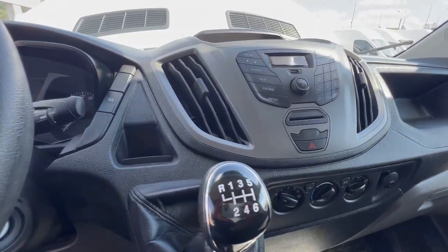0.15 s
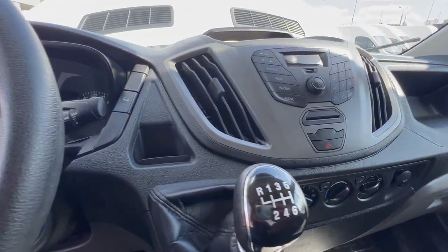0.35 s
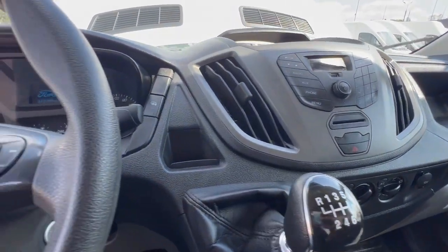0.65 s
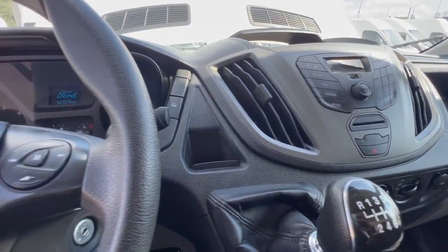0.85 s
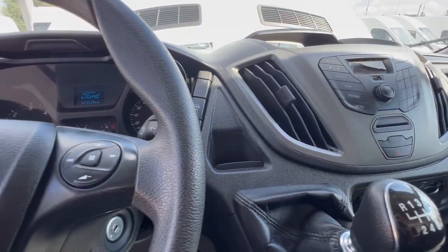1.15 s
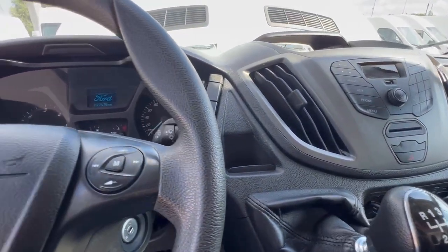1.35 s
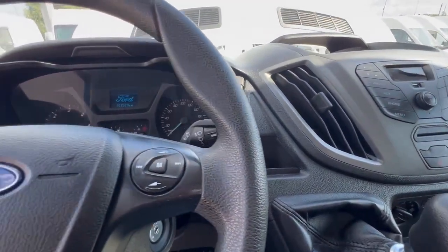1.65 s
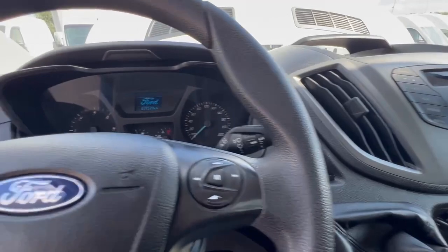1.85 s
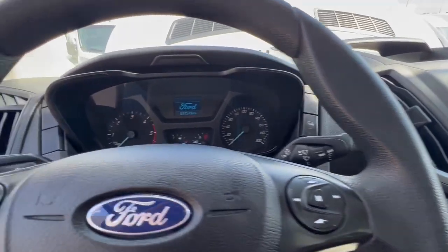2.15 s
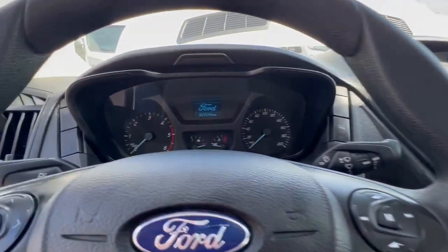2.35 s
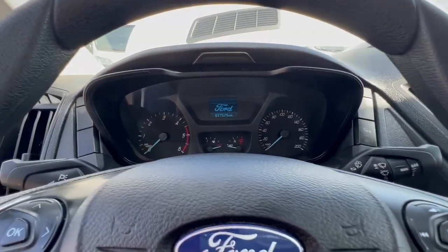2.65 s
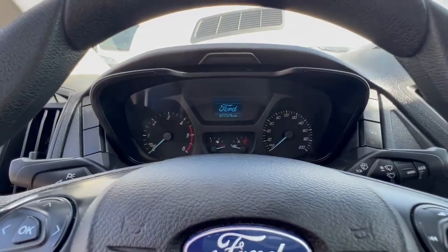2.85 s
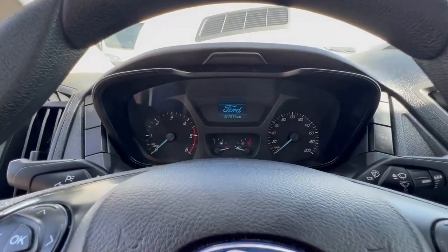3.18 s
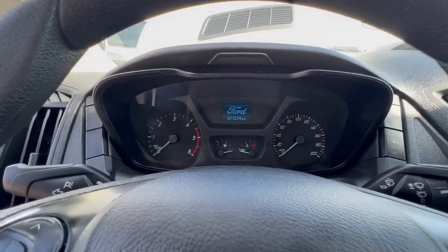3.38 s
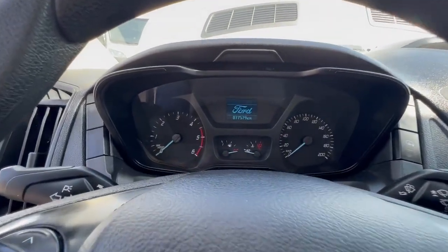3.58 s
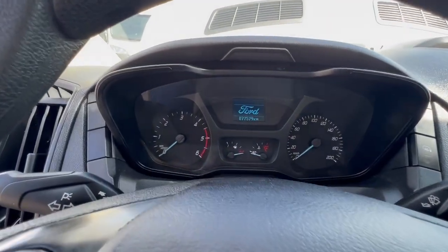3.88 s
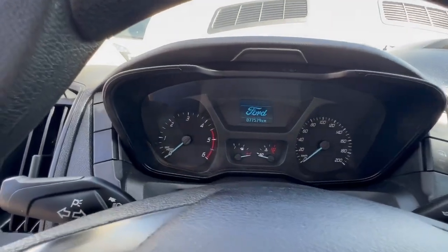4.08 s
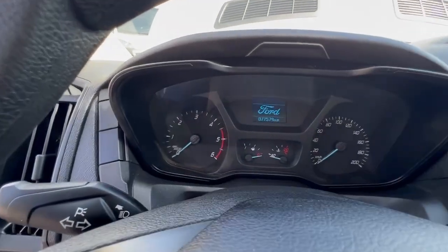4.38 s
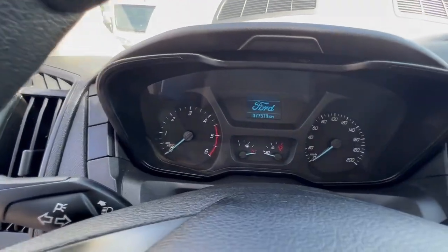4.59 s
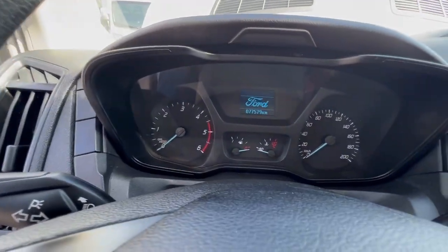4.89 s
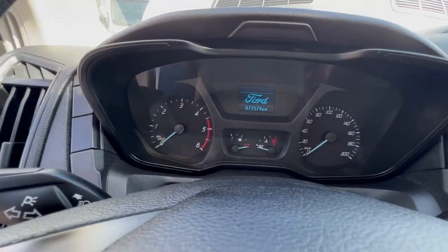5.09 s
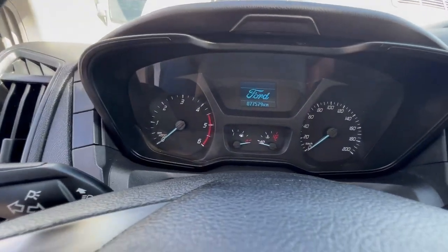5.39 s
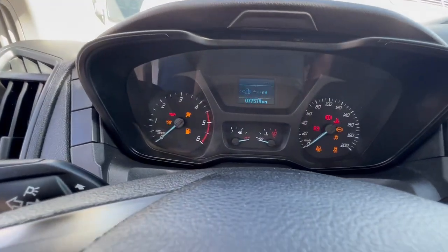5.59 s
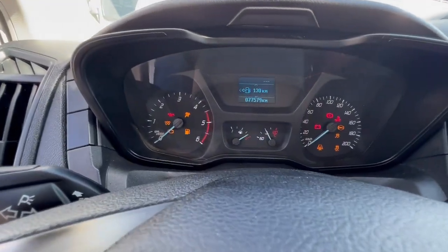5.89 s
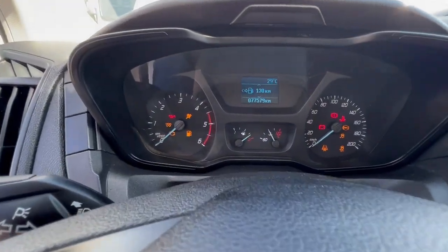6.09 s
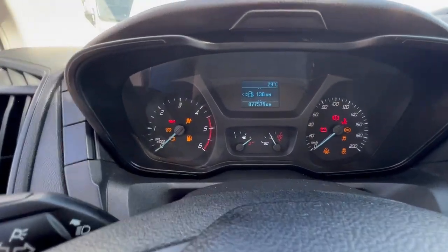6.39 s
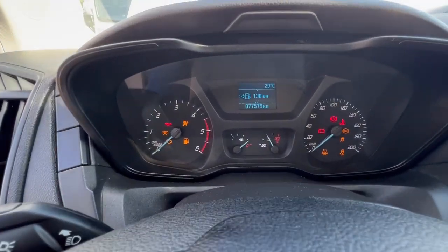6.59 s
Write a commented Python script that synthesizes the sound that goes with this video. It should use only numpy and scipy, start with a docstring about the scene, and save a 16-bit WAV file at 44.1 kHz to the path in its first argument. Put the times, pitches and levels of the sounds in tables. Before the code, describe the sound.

Close, sharp creaks of fingers on a phone come first, on the left, over the low rumble and hiss inside a parked van. Then come a soft sleeve rustle, light key clinks and a faint faraway engine hum. A key slides into the ignition lock with scrapes and clicks, and clacks as it turns. Finally two small motors briefly wind down with soft, low groans.

```python
"""Inside a parked van, a low rumble and a thin hiss fill the cab. First, fingers rub and creak on the
phone near its left microphone, by stick-slip friction. From 2 s a distant engine hums faintly, a sleeve
rustles and hanging keys clink. At 5 s the key scrapes into the ignition lock and turns with a sharp
clack, its impacts exciting the modes of keys, steering column and dashboard. Last, as the electrics
wake, two small motors run down in soft falling groans."""
import sys
import numpy as np
from scipy import signal
from scipy.fft import rfft, irfft, next_fast_len
from scipy.io import wavfile

SR = 44100
rng = np.random.default_rng(int(sys.argv[2]) if len(sys.argv) > 2 else 0)


def transcribe(u):
    """Save the signal u as a 16-bit wav file named by the first command-line argument.

    u: samples, shape (n,) or (channels, n), limited to [-1, 1]; the rate is SR.
    q: integer samples, one column per channel.
    """
    v = np.clip(np.atleast_2d(u).T, -1, 1)
    q = np.round(v * 32767).astype(np.int16)
    wavfile.write(sys.argv[1], SR, q)


N = 297145
TIME = np.arange(N) / SR
FFT_SIZE = next_fast_len(N, True)
HZ = np.maximum(np.arange(FFT_SIZE // 2 + 1) * SR / FFT_SIZE, 1)

# Levels in all tables are relative: later gains and filters act on them.
# Noise in the cab. Each row: time in seconds, rumble level in dB, hiss level in dB.
CAB_NOISE_LEVELS = [(0, -51, -58), (1.55, -50, -58.5), (1.75, -62.5, -61), (2.03, -64.5, -64),
                    (2.15, -54.5, -62), (2.6, -55, -58), (4.9, -48.5, -58.5), (6.74, -47, -58.5)]
# Dull roar from outside. Each row: time in seconds, level in dB.
ROAR_LEVELS = [(0, -58), (1.55, -53.5), (1.8, -63), (2.45, -62.5), (2.8, -52.5), (6.74, -50)]
# Hum of a distant engine. Each row: time in seconds, frequency in Hz, level in dB.
ENGINE_HUM = [(2.05, 89.8, -55.5), (2.8, 90.03, -50.5), (4.7, 92.94, -53), (6.74, 97.2, -101)]
# Spectra of the noises. Each row: frequency in Hz, spectral density in dB.
RUMBLE_SPECTRUM = [(18, -35), (30, -9.5), (42, 8), (54, 7.5), (72, 0.5), (115, -16), (260, -52)]
ROAR_SPECTRUM = [(90, 7), (150, 0.5), (290, -7), (750, -14.5), (1200, -15), (2200, -71)]
HISS_SPECTRUM = [(300, -13), (620, -9.5), (950, -2.5), (1400, -7), (1850, 0), (2200, -9), (3000, -22.5),
                 (5000, -27), (7000, -23), (12000, -44)]
CLOTH_SPECTRUM = [(400, -16), (800, 11.5), (2700, 5), (4000, 3), (10000, 4.5), (11000, -75)]
SKIN_SPECTRUM = [(150, -7), (450, -2.5), (1900, 5.5), (2800, -13.5), (6200, -19), (10000, -39)]
# Likeness of left and right noise. Each row: frequency in Hz, correlation from -1 to 1.
STEREO_CORRELATION = [(110, 0.87), (270, 0.63), (570, -0.32), (1200, -0.3), (3500, 0.21), (11000, -0.26)]
# Balance of the hiss. Each row: frequency in Hz, left minus right in dB.
HISS_BALANCE = [(400, -12.5), (1300, 5), (1900, 12), (3000, 2.5)]

# Sliding movements. Each row: start in seconds, length in seconds, level in dB.
SLEEVE_SLIDES = [(2.02, 0.1, -64), (2.25, 0.31, -63), (2.65, 0.2, -58), (3.06, 0.37, -66),
                 (3.62, 0.23, -55), (3.9, 0.021, -50.5), (4.2, 0.11, -50)]   # the arm reaches for the lock
FINGER_SLIDES = [(.278, 0.026, -44.5), (.395, 0.074, -40), (1.37, 0.0096, -35.5), (1.447, 0.0078, -34)]   # skin moves over the phone
BLADE_SLIDES = [(5.015, 0.038, -45), (5.052, 0.042, -41.5), (5.15, 0.098, -46), (5.392, 0.029, -38.5)]   # the blade finds the slot, enters, slides home and is turned
# Finger creaks. Each row: centre in seconds, peak in dB, half length in seconds,
# first and last slip rate in Hz, tick level in dB.
FINGER_CREAKS = [(0.404, -23, 0.0014, 1760, 890, -41), (0.5247, -35.5, 0.00084, 1970, 1200, -23),
                 (0.898, -7.5, 0.0015, 1920, 533, -37), (0.9356, -22, 0.0013, 1640, 1000, -56),
                 (1.2876, -22.5, 0.0015, 1620, 1660, -30.5), (1.3007, -22, 0.0067, 1690, 1440, -42),
                 (1.3027, -17.5, 0.0015, 1570, 925, -14.5), (1.3121, -6, 0.001755, 1753, 433, -36),
                 (1.4663, -8, 0.0039, 642, 480, -22.5), (1.496, -8, 0.0021, 920, 900, -25.5)]
# Motors running down. Each row: start and length in seconds, first and last frequency in Hz, level in dB.
MOTOR_RUNS = [(6.226, 0.155, 152, 90.5, -41.5), (6.465, 0.163, 125.4, 73.6, -42)]
# Clinks of the hanging keys. Each row: start in seconds, level in dB, emphasised frequency in Hz,
# rattle time in seconds, tap on the column in dB.
KEY_CLINKS = [(2.469, -56, 4200, 0.0028, -59), (2.749, -56, 6560, 0.0017, -54),
              (3.635, -59, 5060, .0012, -48), (3.674, -50.5, 4800, 0.0058, -48.5),
              (3.7475, -54, 4540, 0.0014, -51), (3.992, -52, 3900, 0.00087, -60),
              (4.012, -50, 4800, 0.0037, -64), (4.095, -38, 3880, 0.0033, -41.5),
              (4.196, -33.5, 4400, 0.01, -44), (4.6768, -49.5, 4440, 0.0015, -62),
              (4.7666, -46.5, 5800, 0.0027, -50), (4.962, -55, 8200, 0.0026, -51.5),
              (5.2747, -44, 7140, 0.0016, -43.5), (5.535, -43.5, 7850, 0.0061, -43),
              (5.7057, -54, 9000, 0.023, -59)]
# The hand bumps the column. Each row: start in seconds, knock and thump in dB, rattle time in seconds.
HAND_BUMPS = [(3.643, -44.5, -61, 0.0052), (4.6752, -54, -51.5, 0.0037), (4.998, -53.5, -43, 0.0048),
              (5.117, -52, -42.5, 0.0088), (5.456, -52, -47.5, 0.0057), (5.491, -52, -56, 0.012),
              (6.099, -52, -52, 0.0091), (6.23, -52.5, -46, 0.0087), (6.399, -52.5, -41, 0.036)]
# The lock catches. Each row: start in seconds, metal level in dB, emphasised frequency in Hz,
# rattle time in seconds, knock and thump in dB.
LOCK_CLACKS = [(5.05, -44, 4500, 0.0027, -45, -43), (5.0827, -46, 7700, 0.004, -38.5, -38),
               (5.195, -46, 4220, 0.0035, -60, -47), (5.2112, -41.5, 3900, 0.0027, -42.5, -36),
               (5.222, -43, 7300, 0.0017, -39.5, -33), (5.292, -50, 3500, 0.0028, -42.5, -43),
               (5.309, -37.5, 3400, 0.0012, -38, -37.5), (5.3771, -33, 2900, 0.0033, -35, -35),
               (5.3824, -30, 6900, 0.005, -36.5, -31.5)]

# Modes of the keys. Each row: frequency in Hz, strength in dB.
KEY_RESONANCES = [(2965, 4), (3240, 0.5), (3610, 1.5), (4120, -0.5), (4320, 4), (4650, -2.5), (5820, -7),
                  (6265, -4), (6570, -5), (6850, -7), (8100, -4), (8420, 0), (9355, 1.5), (9755, -6.5)]
# Modes of the other bodies. Each row: frequency in Hz, bandwidth in Hz, strength in dB.
COLUMN_RESONANCES = [(814, 63, 6), (1077, 22, 8), (1420, 230, 0), (1976, 130, 4.5), (2280, 54, 2.5),
                     (2625, 155, 0)]
DASH_RESONANCES = [(118, 41, -0.21), (227, 40, 0.78), (297, 20.4, 0), (477, 77, 2), (626, 66, -1.5)]
CASE_RESONANCES = [(480, 246, 2.1), (1150, 220, 0.72), (1910, 290, 1.8)]
FLEX_RESONANCES = [(92, 75, -1.5), (260, 127, -1)]   # the phone gives under each push
# Reverberation of the cab. Each row: frequency in Hz, time to fall 60 dB in seconds.
CAB_DECAY = [(100, 0.37), (1000, 0.11), (11000, 0.14)]

CRACK_HZ = (2700, 8300)   # band of the bare click of a hard contact


def from_db(db):
    """Amplitude grows tenfold for every 20 dB."""
    return 10 ** (np.asarray(db) / 20)


def unit_rms(x):
    """Normalisation to a mean power of 1."""
    return x / np.sqrt(np.mean(x ** 2) + 1e-20)


def in_time(rows):
    """Linear interpolation gives each column a value at every sample."""
    times, *columns = np.transpose(rows)
    return [np.interp(TIME, times, column) for column in columns]


def at_hz(points, hz):
    """Interpolation on a logarithmic frequency axis."""
    frequencies, values = np.transpose(points)
    return np.interp(np.log(hz), np.log(frequencies), values)


def balance(db):
    """A level difference, left minus right, places a sound to one side."""
    return from_db(np.array([[.5], [-.5]]) * db)


def band(x, low_hz, high_hz):
    """A causal Butterworth band-pass."""
    sections = signal.butter(2, [low_hz, min(high_hz, .45 * SR)], "band", fs=SR, output="sos")
    return signal.sosfilt(sections, x + 1e-18)


def lowpass(x, hz, order=8):
    """A causal Butterworth low-pass."""
    return signal.sosfilt(signal.butter(order, hz, fs=SR, output="sos"), x)


def through(x, response):
    """Convolution gives a linear system's answer to a stereo input, cut to the input's length."""
    return signal.fftconvolve(x, np.atleast_2d(response), axes=1)[:, :x.shape[1]]


def at_level(x, db):
    """Energy normalisation: each channel holds the energy of 20 ms at the given rms level."""
    return from_db(db) * x * np.sqrt(.02 * SR / np.sum(x ** 2, axis=1, keepdims=True))


def add(out, start, sound):
    """Superposition: a short stereo sound joins the mix at a time in seconds."""
    at = round(start * SR)
    out[:, at:at + sound.shape[1]] += sound[:, :N - at]


def drift(corner_hz):
    """Low-passed noise is a random fluctuation; rms 1."""
    spectrum = rfft(rng.standard_normal(FFT_SIZE)) / (1 + (HZ / corner_hz) ** 2)
    return unit_rms(irfft(spectrum, FFT_SIZE)[:N])


def noise(spectrum, balance_db=0):
    """Partly coherent stereo noise of a given colour, most alike in the bass; rms 1."""
    mid, side = rfft(rng.standard_normal((2, FFT_SIZE)))
    correlation = at_hz(STEREO_CORRELATION, HZ)
    stereo = np.sqrt(1 + correlation) * mid + np.sqrt(1 - correlation) * side * [[1], [-1]]
    skirts = np.minimum(HZ / spectrum[0][0], 1) ** 2 * np.minimum(spectrum[-1][0] / HZ, 1) ** 2
    coloured = stereo * balance(balance_db) * skirts * from_db(at_hz(spectrum, HZ))
    return unit_rms(irfft(coloured, FFT_SIZE)[:, :N])


def uneven(spread_db, shape):
    """Log-normal gains, capped one standard deviation above the median."""
    return from_db(spread_db * np.minimum(rng.standard_normal(shape), 1))


def grit(per_s, spread_db):
    """A Poisson train of clicks, unequal in size and at the two microphones; rms 1."""
    at = np.flatnonzero(rng.random(N) < per_s / SR)
    clicks = np.zeros((2, N))
    clicks[:, at] = uneven(spread_db, len(at)) * rng.standard_normal((2, len(at)))
    return unit_rms(clicks)


def strokes(rows, attack_s, release_s):
    """Envelope of sliding friction: each stroke swells around its start, holds and decays."""
    gain = np.zeros(N)
    for start, length, db in rows:
        swell = np.clip((TIME - start) / attack_s + .5, 0, 1)
        fade = np.exp(-np.clip((TIME - start - length) / release_s, 0, 20))
        gain = np.maximum(gain, from_db(db) * swell * fade)
    return gain


def contacts(rattle_s, per_s=1300, grain_db=11.0, scuff_db=-12.0, rise_share=0.47, size=6000):
    """An impact is a burst of tiny contacts and scuffing that builds as the parts meet, then decays."""
    t = np.arange(1, size + 1) / SR
    impulses = (rng.random(size) < per_s / SR) * uneven(grain_db, size)
    envelope = (1 - np.exp(-t / (rise_share * rattle_s))) * np.exp(-t / rattle_s)
    # each contact reaches the two microphones with its own strength and sign
    return (impulses + from_db(scuff_db)) * rng.standard_normal((2, size)) * envelope


def body(modes, spread_db=0, size=4096):
    """A struck body rings as a sum of damped modes, weighted by the point struck; unit energy."""
    t = np.arange(size) / SR
    hz, width, db = np.transpose(modes)[:, :, None]
    polarity = (-1) ** np.arange(len(modes))[:, None]
    strength = from_db(db) * uneven(spread_db, db.shape) * width * polarity
    response = np.sum(strength * np.exp(-np.pi * width * t) * np.cos(2 * np.pi * hz * t), axis=0)
    return response / np.linalg.norm(response)


def cab(x, wet_db, size=9000):
    """Reverberation: dense reflections off glass and trim decay exponentially in every octave."""
    t, tail = np.arange(size) / SR, 0
    for hz in 90 * 2. ** np.arange(8):
        octave = band(rng.standard_normal((2, size)), hz / np.sqrt(2), hz * np.sqrt(2))
        tail += octave * from_db(-60 * t / at_hz(CAB_DECAY, hz))
    tail *= t > .002   # the first reflection takes 2 ms
    return x + from_db(wet_db) * through(x, tail / np.linalg.norm(tail, axis=1, keepdims=True))


def background(rumble_db=3.5, hiss_db=4.5, hum_db=2.0, waver_db=3.5):
    """Transmission into the cab: broadband rumble, roar and hiss, and a distant engine's wavering tone."""
    rumble_level, hiss_level = in_time(CAB_NOISE_LEVELS)
    hum_hz, hum_level = in_time(ENGINE_HUM)
    phase = 2 * np.pi * np.cumsum(hum_hz + drift(6.6)) / SR
    fade_in = np.clip((TIME - ENGINE_HUM[0][0]) / 0.12, 0, 1)
    rumble = from_db(rumble_level + rumble_db) * noise(RUMBLE_SPECTRUM)
    roar = from_db(in_time(ROAR_LEVELS)[0]) * noise(ROAR_SPECTRUM)
    hiss = from_db(hiss_level + hiss_db) * noise(HISS_SPECTRUM, at_hz(HISS_BALANCE, HZ))
    hum = from_db(hum_level + hum_db + waver_db * drift(21.0)) * fade_in * np.sqrt(2) * np.sin(phase)
    return rumble + roar + hiss + hum


def sleeve(grain_db=1.0, catch_db=2.5, crackle_db=-10.5, top_hz=9800):
    """Friction noise: fibres catch and let go in a fine crackling hiss."""
    cloth = from_db(grain_db * drift(250.0) + catch_db * drift(25.0)) * noise(CLOTH_SPECTRUM)
    snaps = band(grit(per_s=420, spread_db=9.0), 1400, top_hz)
    rustle = lowpass(cloth + from_db(crackle_db) * unit_rms(snaps), top_hz, order=12)
    return strokes(SLEEVE_SLIDES, attack_s=0.11, release_s=0.056) * unit_rms(rustle)


def motors(subharmonic_db=-3.0):
    """Pitch follows rotation speed: each slowing motor glides down over a weaker tone an octave below."""
    out = np.zeros(N)
    for start, length, first_hz, last_hz, db in MOTOR_RUNS:
        progress = np.clip((TIME - start) / length, 0, 1)
        phase = 2 * np.pi * np.cumsum(first_hz + (last_hz - first_hz) * progress) / SR
        envelope = from_db(db) * np.sqrt(2 * np.abs(np.sin(np.pi * progress)))
        out += envelope * (np.sin(phase) + from_db(subharmonic_db) * np.sin(phase / 2))
    return out


def fingers(far_side_db=-26.5, thud_db=-4.5, push_db=-20.0, rub_db=-15, rub_fade_s=0.0059, size=8192):
    """Stick-slip friction: skin slips ever more slowly, ringing the case and the left microphone port."""
    creak, ticks, push = np.zeros((3, N))
    sliding = strokes(FINGER_SLIDES, attack_s=0.058, release_s=0.017)
    t = (np.arange(size) - size // 2) / SR
    case, flex = body(CASE_RESONANCES), body(FLEX_RESONANCES)
    for centre, peak_db, half_length, first_hz, last_hz, tick_db in FINGER_CREAKS:
        pressure = np.exp(-(t / half_length) ** 2)
        slip_hz = np.interp(t, [0, half_length], [first_hz, last_hz])
        cycles = np.cumsum(slip_hz) / SR
        slip_count = np.floor(cycles - cycles[size // 2])
        # the longer the skin sticks, the harder it slips
        slips = np.diff(slip_count, prepend=slip_count[0]) * pressure / np.sqrt(slip_hz)
        ring = lowpass(band(signal.fftconvolve(slips, case)[:size], 150, 2800), 2550)
        sway = signal.fftconvolve(pressure, flex)[:size]
        at = round(centre * SR) - size // 2
        span = slice(at, at + size)
        creak[span] += from_db(peak_db) * ring / np.abs(ring).max()
        ticks[span] += from_db(tick_db) * pressure ** 2 * rng.standard_normal(size)
        push[span] += from_db(peak_db + push_db) * sway / np.abs(sway).max()
        # after each creak the skin rubs on and fades
        rub_envelope = np.where(t < 0, pressure, np.exp(-np.abs(t) / rub_fade_s))
        sliding[span] += from_db(peak_db + rub_db) * rub_envelope
    rub = sliding * from_db(3.0 * drift(240.0)) * noise(SKIN_SPECTRUM)[0]
    treble = from_db(-1.0) * band(ticks, 7100, 7200) + from_db(-6.5) * band(ticks, 7700, 8200)
    crackle = band(ticks, 3040, 5440) + treble
    near = creak + crackle + rub + band(push, 45, 420)
    # the thud travels through the case to both microphones
    thud = from_db(thud_db) * band(near, 66, 820) * [[1], [-1]]
    return near * from_db([[0], [far_side_db]]) + thud


def key_ring(spread_db, detune, width_hz=77):
    """Free vibration of one key: the bunch's modes, each with its own strength and slight shift."""
    modes = [(hz * (1 + detune * rng.standard_normal()), width_hz, db) for hz, db in KEY_RESONANCES]
    return body(modes, spread_db)


def jingle(touch, db, bright_hz, ring_db=-4.0, focus_db=0.5):
    """Damping: held in the hand, the keys ring only briefly behind the crack of the contact."""
    ring = through(touch, key_ring(spread_db=11.0, detune=0.018))
    metal = band(touch, *CRACK_HZ) + from_db(ring_db) * ring
    # the size of the part that strikes decides which modes stand out
    focus = band(metal, bright_hz / 1.23, bright_hz * 1.32)
    return at_level(metal + from_db(focus_db) * focus, db)


def knock(touch, db, crack_db=-6.5):
    """Impact response of the steering column's plastic shroud: a dry crack and a short ring."""
    ring = band(through(touch, body(COLUMN_RESONANCES, spread_db=5.5)), 240, 2900)
    return at_level(ring + from_db(crack_db) * band(touch, 670, 2650), db)


def thump(touch, db, panel_db=2.0):
    """Panel vibration of the dashboard: a broad thud and a short low ring, stronger on the right."""
    ring = through(touch, body(DASH_RESONANCES, spread_db=3.0))
    return at_level(band(ring + from_db(panel_db) * touch, 64, 400), db) * balance(-4.0)


def keys():
    """Light collisions: the hanging keys strike each other and tap the column."""
    out = np.zeros((2, N))
    for start, db, bright_hz, rattle_s, tap_db in KEY_CLINKS:
        touch = contacts(rattle_s)
        clink = jingle(touch, db, bright_hz, ring_db=-10.0)
        add(out, start, clink + knock(touch, tap_db, crack_db=20.0))
    return out


def hand(scuff_db=-10.5):
    """Soft impacts: the hand excites column and dashboard, each time with a faint dry scuff."""
    out = np.zeros((2, N))
    for start, knock_db, thump_db, rattle_s in HAND_BUMPS:
        touch = contacts(rattle_s)
        scuff = at_level(band(touch, *CRACK_HZ), knock_db + scuff_db)
        add(out, start, knock(touch, knock_db) + thump(touch, thump_db) + scuff)
    return out


def blade(grain_db=5.0, crack_db=-7.0, metal_db=-5.5, column_db=-0.5, dash_db=0.5, tumblers=4):
    """Scraping is a train of impacts: each tumbler catches on the blade and rings in its own colour."""
    pressure = strokes(BLADE_SLIDES, attack_s=0.042, release_s=0.0032)
    grind, rings = 0, 0
    for _ in range(tumblers):
        catches = pressure * grit(per_s=330, spread_db=grain_db) / np.sqrt(tumblers)
        catches *= from_db(grain_db * np.minimum(drift(43.0), 1))
        metal = from_db(metal_db) * key_ring(grain_db, detune=0.043)
        column = from_db(column_db) * band(body(COLUMN_RESONANCES, grain_db), 680, 1800)
        grind += catches
        rings += through(catches, metal + column)
    dash = from_db(dash_db) * band(through(grind, body(DASH_RESONANCES)), 63, 840)
    return rings + from_db(crack_db) * band(grind, *CRACK_HZ) + dash


def lock(shake_delay_s=0.00499, shake_rattle_s=0.016, shake_knock_db=-23, shake_thump_db=-9):
    """Structure-borne sound: each catch rings keys, column and dashboard, then leaves the trim rattling."""
    out = np.zeros((2, N))
    for start, metal_db, bright_hz, rattle_s, knock_db, thump_db in LOCK_CLACKS:
        touch, shake = contacts(rattle_s), contacts(shake_rattle_s)
        clack = jingle(touch, metal_db, bright_hz) + knock(touch, knock_db) + thump(touch, thump_db)
        trim = knock(shake, knock_db + shake_knock_db) + thump(shake, thump_db + shake_thump_db)
        add(out, start, clack)
        add(out, start + shake_delay_s, trim)
    return out


def scene(strike_db=2.0, keys_db=-3.5):
    """Direct and reflected sound add at the phone; the fingers, being nearest, sound drier than the lock."""
    loose_keys = cab(from_db(keys_db) * keys(), wet_db=-7.0)
    ignition = cab(from_db(strike_db) * (lock() + hand()) + blade(), wet_db=-7.5)
    return background() + sleeve() + cab(fingers(), wet_db=-17.5) + loose_keys + ignition + motors()


def record(dry, rolloff_hz=10600, cutoff_hz=11800):
    """Filtering: two narrow notches colour the sound; the treble rolls off, then ends at the cutoff."""
    for notch_hz, width_hz in [(5270, 370), (7550, 510)]:
        dry = signal.lfilter(*signal.iirnotch(notch_hz, notch_hz / width_hz, fs=SR), dry)
    steep_cut = signal.ellip(10, .3, 80, cutoff_hz, fs=SR, output="sos")
    return signal.sosfilt(steep_cut, lowpass(dry, rolloff_hz))


dry = scene()
out = record(dry)
transcribe(out)
```